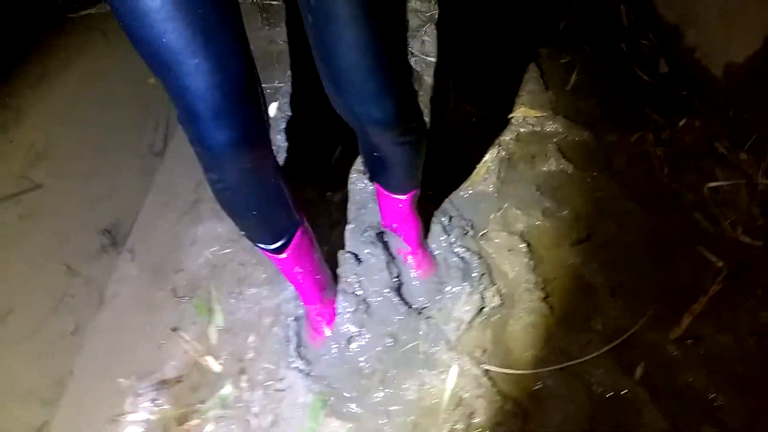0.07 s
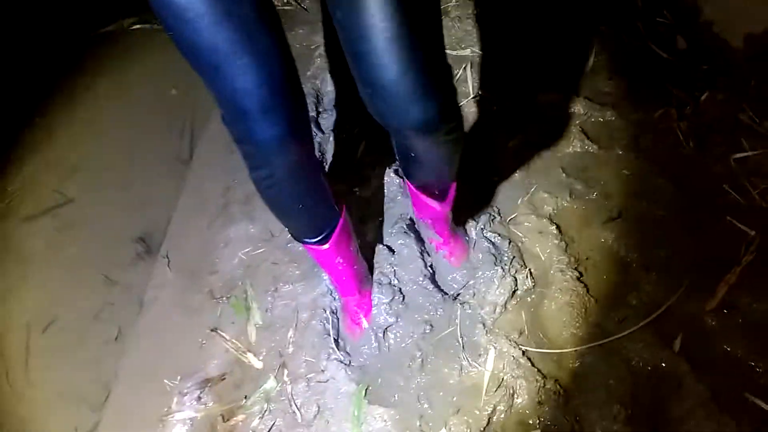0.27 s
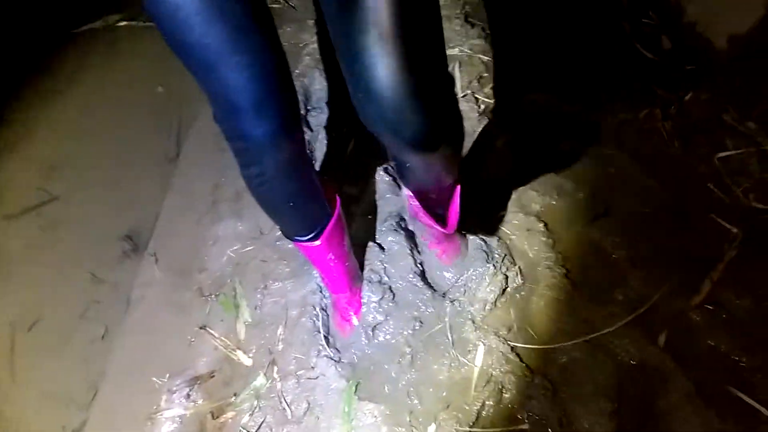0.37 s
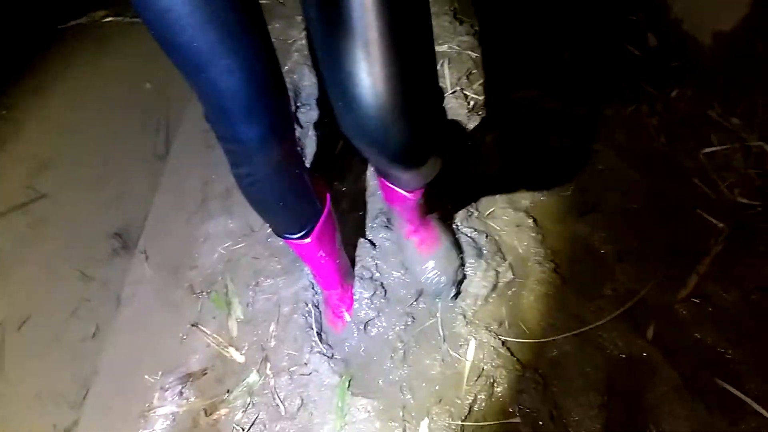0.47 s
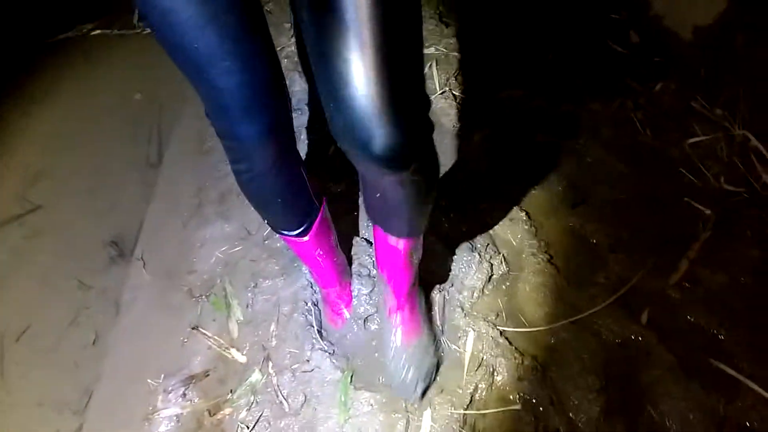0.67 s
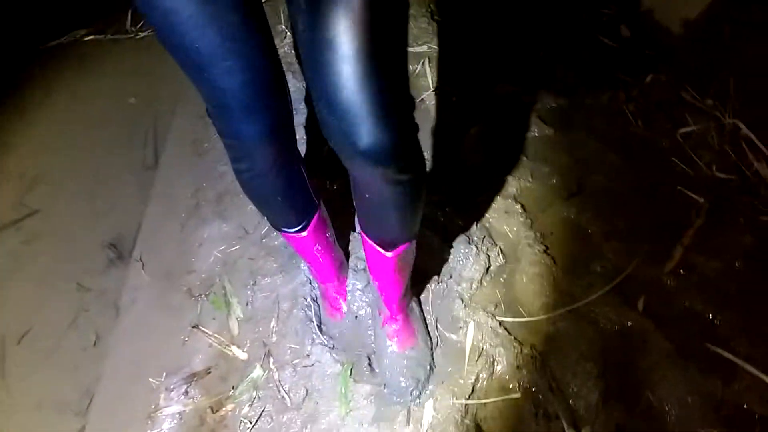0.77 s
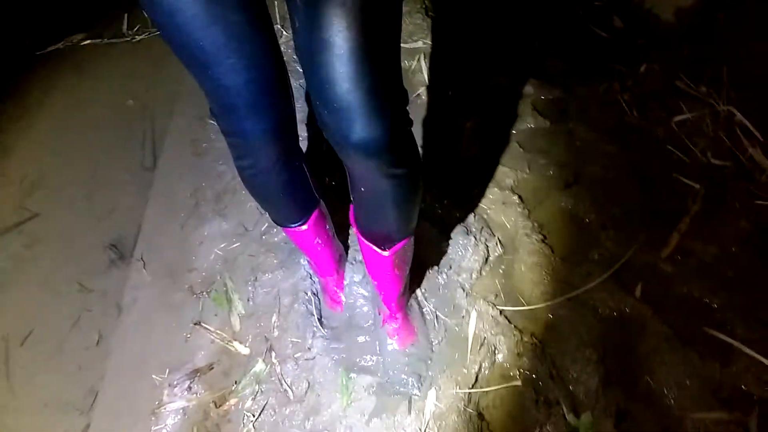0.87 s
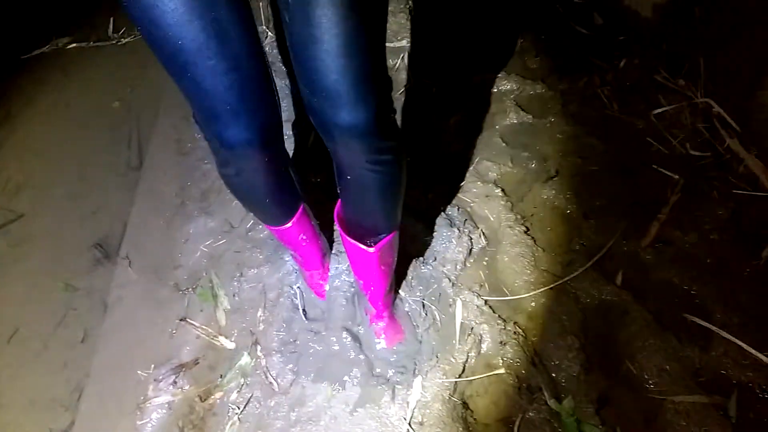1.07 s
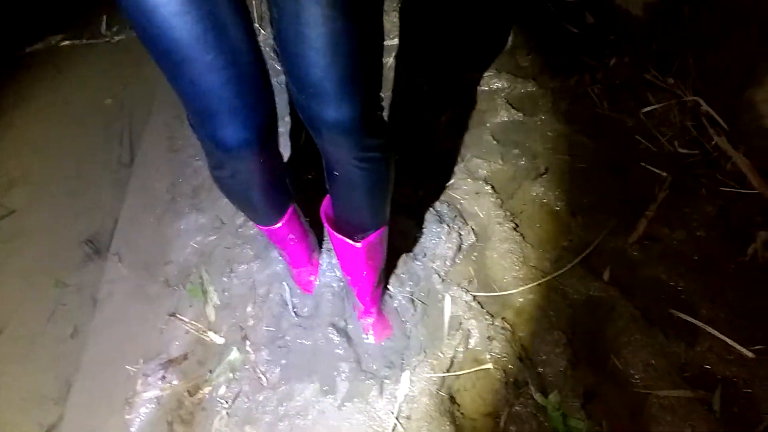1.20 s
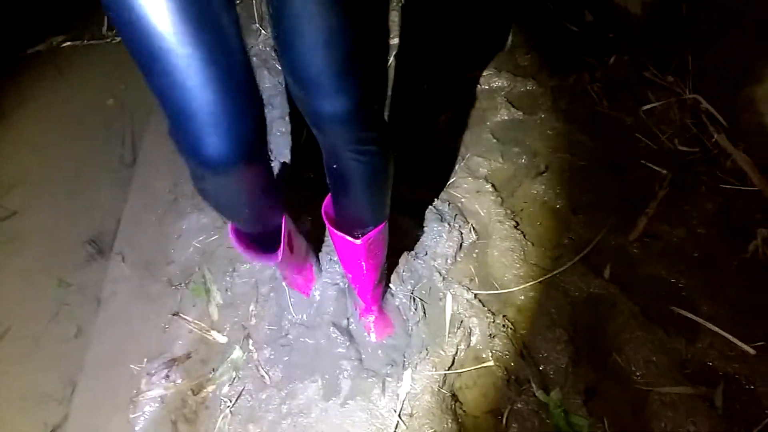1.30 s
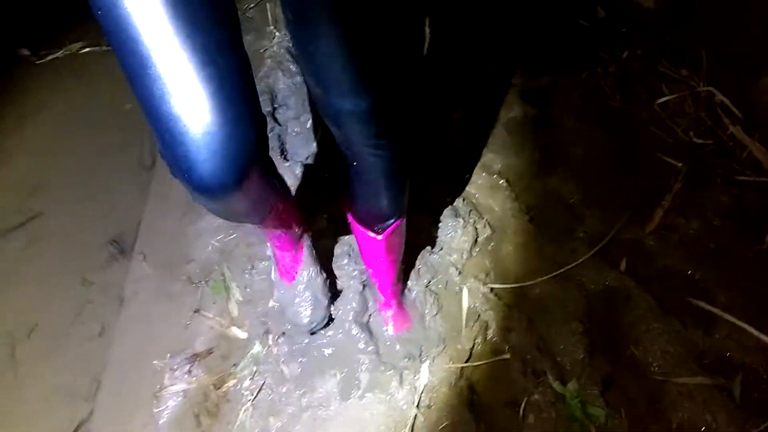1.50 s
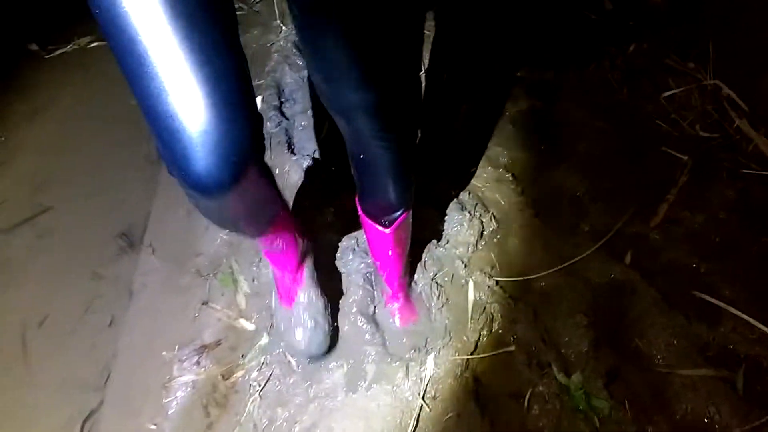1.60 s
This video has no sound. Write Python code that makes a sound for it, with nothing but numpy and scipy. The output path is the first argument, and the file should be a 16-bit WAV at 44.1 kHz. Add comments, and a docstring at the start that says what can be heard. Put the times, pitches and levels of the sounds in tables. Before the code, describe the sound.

Rubber boots squelch in sticky mud outdoors, close to the microphone. One pulls free with a loud sucking pop and lands with a softer splat, then the other starts pulling out, over a faint hiss.

```python
"""Outdoors at night, just above sticky mud: one rubber boot tears free with a loud suck and is set down
with a wet splat; then the other starts to pull out. Rupturing mud films radiate bursts of tiny impulses,
which excite bubbles and the hollow under the sole. Air pockets pop as damped oscillators, the mud keeps
ticking, wet rubber squeaks and the ground thuds. Near reflections and a faint scatter from the banks
follow; a soft hiss and a low rumble on the microphone lie beneath."""
import sys
import numpy as np
from scipy import signal
from scipy.fft import rfft, irfft, next_fast_len
from scipy.io import wavfile
from scipy.ndimage import uniform_filter1d

SR = 44100
rng = np.random.default_rng(int(sys.argv[2]) if len(sys.argv) > 2 else 0)


def inscribe(sig):
    """Save sig as 16-bit PCM at rate SR to the path in sys.argv[1].

    A 1-D sig is mono; a 2-D sig holds one channel per row.
    Samples are clipped to [-1, 1] before scaling.
    """
    pcm = np.round(np.clip(np.atleast_2d(sig).T, -1, 1) * 32767)
    wavfile.write(sys.argv[1], SR, pcm.astype(np.int16))


N = 72765
TIME, FREQS = np.arange(N) / SR, np.fft.rfftfreq(N, 1 / SR)


def from_db(db):
    """Amplitude ratio of a level in decibels."""
    return 10 ** (np.asarray(db) / 20)


def unit_rms(x):
    """Normalisation to an rms of 1."""
    return x / np.sqrt(np.mean(x ** 2) + 1e-20)


def at_hz(points, hz):
    """Interpolation of a table on a logarithmic frequency axis."""
    f, value = np.transpose(points)
    return np.interp(np.log(np.maximum(hz, 1)), np.log(f), value)


def colour(x, points, power=1):
    """Minimum-phase filtering by the folded cepstrum; the gain in dB is the table times power."""
    size = 2 * next_fast_len(len(x))
    gain = from_db(at_hz(points, np.fft.rfftfreq(size, 1 / SR)))
    cepstrum = irfft(power * np.log(gain))
    cepstrum[1:size // 2] *= 2
    cepstrum[size // 2 + 1:] = 0
    return irfft(rfft(x, size) * np.exp(rfft(cepstrum)))[:len(x)]


def resonate(x, hz, q):
    """Resonance as a steep band-pass of bandwidth about hz / q."""
    edge = np.exp(.5 / q)
    band = [hz / edge, min(hz * edge, SR / 2 - 1)]
    return signal.sosfilt(signal.butter(2, band, "band", fs=SR, output="sos"), x + 1e-18)


def add(out, onset, x):
    """Superposition of x on out, from an onset in seconds."""
    start = int(max(onset, 0) * SR)
    out[..., start:start + x.shape[-1]] += x[..., :N - start]


def clicks(per_s, size, spread_db=3.5):
    """A Poisson process of impulses, uneven in size and sign."""
    heights = from_db(spread_db * np.minimum(rng.exponential(1, size), 3))
    signs = rng.choice([-1, 1], size)
    return heights * signs * (rng.random(size) < per_s / SR)


def drift(size, window):
    """Slow random fluctuation: a moving average of white noise, rms 1."""
    return unit_rms(uniform_filter1d(rng.standard_normal(size), window))


def stereo_noise(spectrum, correlation):
    """Partially coherent noise: the balance of mid and side sets the correlation; rms 1."""
    mid, side = rfft(rng.standard_normal((2, N))) * from_db(at_hz(spectrum, FREQS))
    alike = np.clip(at_hz(correlation, FREQS), -1, 1)
    return unit_rms(irfft(np.sqrt(1 + alike) * mid + np.sqrt(1 - alike) * side * [[1], [-1]], N))


# Spectral density of the hiss: f/Hz, relative level/dB
HISS_SPECTRUM = [(30, 3.5), (130, -2.5), (250, -6.5), (400, -8), (700, -12.5), (1200, -13.5), (2000, -15.5),
                 (3000, -14), (4500, -16.5), (7000, -15), (9400, -14), (11500, -23.5), (13000, -25.5),
                 (16000, -40)]
# Coherence of the hiss: f/Hz, left-right correlation
HISS_CORRELATION = [(100, 1), (400, 0.83), (1000, 0.2), (2500, 0), (6000, 0), (14000, 0.07)]


def hiss(level_db=-52, waver_db=0.03):
    """Night air and the microphone give nearly stationary broadband noise."""
    gain = from_db(level_db + waver_db * drift(N, window=2500))
    return gain * stereo_noise(HISS_SPECTRUM, HISS_CORRELATION)


# Envelope of the rumble: t/s, level/dB
RUMBLE_ENVELOPE = [(0.0, -51), (0.16, -65.5), (0.362, -43.5), (0.398, -67), (0.514, -45), (0.556, -55.5),
                   (0.666, -57), (0.684, -52), (0.914, -58), (0.936, -45), (0.982, -63), (1.006, -46),
                   (1.074, -51), (1.216, -43), (1.432, -52), (1.466, -44.5), (1.584, -50.5), (1.65, -57)]
# Spectral density of the rumble: f/Hz, relative level/dB
RUMBLE_SPECTRUM = [(10, -26), (25, -19), (45, -1.5), (65, -3), (95, -1), (130, -10), (200, -23), (500, -53)]


def rumble(gain_db=0.5):
    """Air and handling on the microphone give amplitude-modulated low-frequency noise."""
    envelope = from_db(gain_db + np.interp(TIME, *np.transpose(RUMBLE_ENVELOPE)))
    return envelope * stereo_noise(RUMBLE_SPECTRUM, correlation=[(30, 0.63), (130, 0.17)])


# Small films snapping: t/s, level before filtering/dB
FILM_SNAPS = [(0.012, -36.5), (0.319, -40), (0.347, -42), (0.395, -41), (0.703, -50), (0.854, -50),
              (1.055, -37.5), (1.14, -37.5), (1.474, -39)]
# Spectrum of fine spray, shared by snaps, bubbles and tears: f/Hz, gain/dB
SPRAY_SPECTRUM = [(300, -35.5), (1000, -19), (2200, 0), (3400, 1), (4500, 0), (6000, -1), (7500, -6),
                  (9600, 4), (11500, -18), (14000, -30), (16000, -30)]


def snaps(size=1024, t60=0.0065, ticks_per_s=84, tick_db=-66.5):
    """Film rupture is a broadband transient: single films snap, and fainter ones tick at random."""
    out = from_db(tick_db) * unit_rms(clicks(ticks_per_s, N))
    decay = 1000 ** (-TIME[:size] / t60)
    for onset, db in FILM_SNAPS:
        snap = rng.standard_normal(size) * decay
        add(out, onset, from_db(db) * 2 * snap / np.abs(snap).max())
    return colour(out, SPRAY_SPECTRUM)


# Air pockets bursting: t/s, starting f/Hz, peak level/dB, T60/s, glide/(octaves per s)
AIR_POCKETS = [(0.062, 910, -50.5, 0.02, 22), (0.208, 470, -47.5, 0.032, 15), (0.2572, 1670, -8, 0.017, 36),
               (0.2701, 1495, -18.5, 0.016, 7.6), (0.2765, 1992, -25, 0.048, 6.5),
               (0.376, 960, -45.5, 0.013, 20), (0.4185, 2270, -47.5, 0.028, 6.7),
               (0.4353, 1726, -36.5, 0.012, 9.6), (0.488, 543, -29.5, 0.01, 37),
               (0.747, 4400, -29.5, 0.014, 11), (0.7492, 2380, -25.5, 0.0097, 20),
               (0.7685, 1850, -33.5, 0.04, 3.9), (0.7705, 6400, -24, 0.017, 13),
               (0.8135, 2270, -39, 0.012, 110), (0.8375, 1080, -39.5, 0.0078, 51),
               (0.8384, 2980, -30, .018, 5.7), (0.8402, 3930, -35, 0.0058, 80),
               (0.8805, 860, -46.5, .012, 23), (1.2589, 1150, -34.5, 0.012, 7.1),
               (1.335, 513, -39, 0.0074, 69), (1.512, 830, -48.5, 0.014, 18)]


def pops(size=2048, attack_s=0.0002, wobble=0.066):
    """An opening air pocket rings as a damped oscillator whose frequency rises unsteadily."""
    out, t = np.zeros(N), TIME[:size]
    for onset, hz, db, t60, glide in AIR_POCKETS:
        pitch = hz * 2 ** (glide * t) * (1 + wobble * drift(size, window=24))
        phase = 2 * np.pi * np.cumsum(pitch) / SR
        envelope = (1 - np.exp(-t / attack_s)) * 1000 ** (-t / t60)
        add(out, onset, from_db(db) * envelope / envelope.max() * np.sin(phase))
    return out


# Faint squeaks of wet rubber: t/s, duration/s, first f/Hz, last f/Hz, level/dB
RUBBER_SQUEAKS = [(0.094, 0.033, 2206, 2130, -55), (0.133, 0.054, 2030, 1860, -53),
                  (0.30, 0.086, 1554, 1480, -59), (0.492, 0.032, 1350, 1525, -53.5),
                  (1.041, 0.061, 2800, 2720, -59.5), (1.50, 0.053, 1480, 1450, -58),
                  (1.585, 0.072, 2770, 2830, -57)]


def squeaks(harmonics_db=(-2.5, -6.5, -11), wobble=0.0037):
    """Wet rubber vibrates almost periodically: a harmonic series on a gliding fundamental."""
    out = np.zeros(N)
    for onset, duration, first_hz, last_hz, db in RUBBER_SQUEAKS:
        progress = np.linspace(0, 1, int(duration * SR))
        pitch = first_hz + (last_hz - first_hz) * progress
        pitch *= 1 + wobble * drift(len(progress), window=100)
        phase = 2 * np.pi * np.cumsum(pitch) / SR
        tone = sum(from_db(level) * np.sin(k * phase) for k, level in enumerate(harmonics_db, 1))
        add(out, onset, from_db(db) * np.sin(np.pi * progress) * tone)
    return out


def bubbles(count=16, per_s=3700, low_hz=2485, high_hz=10500):
    """Tiny bubbles in the spray ring briefly as resonators under random impulses; rms 1."""
    pitches = np.geomspace(low_hz, high_hz, count)
    froth = sum(resonate(clicks(per_s / count, N), hz, q=11.2) for hz in pitches)
    return unit_rms(colour(froth, SPRAY_SPECTRUM))


# Wet mud ripped or squeezed: t/s, rise/s, T60/s, hollow f/Hz, hollow level/dB, spray level/dB,
# slop level/dB, fizz level re spray/dB, left minus right level/dB
MUD_TEARS = [(0.214, 0.0096, 0.086, 2340, -52, -45, -57, -15, -2.5),
             (0.2442, 0.00028, 0.019, 2180, -22, -26.5, -50, -16, -1),
             (0.2454, 0.00026, 0.018, 2950, -25.5, -45, -52, -25, 5),
             (0.2533, 0.00026, 0.026, 1540, -20, -20, -35.5, -12, 9),
             (0.256, 0.00045, .016, 1700, -29.5, -17, -35.5, -13, -10),
             (0.261, 0.0062, 0.032, 1694, -21.5, -24, -31.5, -13, -0.5),
             (0.274, .002, 0.02, 2160, -21, -23.5, -33, -12, 0.5),
             (0.289, 0.0022, 0.024, 2630, -38.5, -53.5, -46, -22, 2),
             (0.599, 0.0036, 0.032, 2400, -82, -47.5, -78, -21, -14),
             (0.7451, 0.00052, 0.056, 2100, -37.5, -32, -50.5, -8, 0),
             (0.757, .001, 0.017, 2700, -60, -35.5, -44.5, -19, 11),
             (0.763, 0.0083, 0.062, 2030, -38.5, -28, -48.5, -3.5, -3.5),
             (0.786, 0.0021, 0.05, 3000, -59, -39, -49.5, -13, 2),
             (0.805, 0.0016, 0.035, 1240, -41.5, -46, -54, -8, -2),
             (0.8151, 0.0019, 0.04, 5030, -55, -37.5, -49, -6, -3.5),
             (0.846, 0.0022, 0.43, 2900, -71, -49, -59.5, -10, 0.5),
             (0.8904, 0.00057, 0.019, 1830, -45, -38, -65, -2.5, -4.5),
             (1.25, 0.0062, 0.021, 1480, -37.5, -39.5, -50.5, -11, -5),
             (1.266, 0.0017, 0.082, 2100, -50, -40.5, -45.5, -11, -3),
             (1.289, .002, 0.04, 4400, -64, -50, -60, -12, 3),
             (1.31, 0.0064, 0.058, 2600, -70, -49, -69, -14, -4),
             (1.397, 0.00089, 0.041, 1220, -54, -49, -52.5, -14, -3)]
# Spectrum of the finest droplets: f/Hz, gain/dB
FIZZ_SPECTRUM = [(4000, -33.5), (7500, -8.5), (9700, 2.5), (11500, -7.5), (14000, -13), (15300, -17),
                 (16000, -27)]
# Spectrum of the heavy slop: f/Hz, gain/dB
SLOP_SPECTRUM = [(30, -40), (80, -24), (170, -7), (340, -6.5), (480, -1), (630, -9), (790, 2.5), (960, -18),
                 (1200, -3.5), (2500, -29), (8000, -85)]


def tears(size=6000, clicks_per_s=10000, bubble_db=1):
    """Source and filter: a swell of ruptures excites spray, dull slop and the hollow under the sole."""
    out, t, froth = np.zeros((2, N)), TIME[:size], bubbles()
    for onset, rise, t60, hollow_hz, hollow_db, spray_db, slop_db, fizz_db, pan_db in MUD_TEARS:
        swell = np.minimum(t / rise, 1) * 1000 ** (-np.maximum(t - rise, 0) / t60)
        rip = clicks(clicks_per_s, size) * swell
        droplets = unit_rms(colour(rip, SPRAY_SPECTRUM))
        bubbling = from_db(bubble_db) * unit_rms(froth[int(onset * SR):][:size] * swell)
        fizz = from_db(fizz_db) * unit_rms(colour(rip, FIZZ_SPECTRUM))
        spray = from_db(spray_db) * (unit_rms(droplets + bubbling) + fizz)
        slop = from_db(slop_db) * unit_rms(colour(rip, SLOP_SPECTRUM))
        hollow = from_db(hollow_db) * unit_rms(resonate(rip, hollow_hz, q=2.66))
        swell_rms = np.sqrt(np.mean(swell ** 2))   # refers the levels to the crest of the swell
        pan = from_db([[pan_db / 2], [-pan_db / 2]])
        add(out, onset, (spray + slop + hollow) * swell_rms * pan)
    return out


# Shifts of weight on the boot: t/s, f/Hz, level/dB, T60/s
WEIGHT_SHIFTS = [(0.492, 166, -46, .06), (0.498, 96, -42, .08), (0.93, 51, -40, 0.17),
                 (1.219, 92, -41, 0.12), (1.335, 194, -45, 0.067), (1.455, 87.5, -54, 0.09)]


def thuds(size=8192, attack_s=0.0095):
    """Soft ground yields under the boot in a heavily damped low-frequency oscillation."""
    out, t = np.zeros(N), TIME[:size]
    for onset, hz, db, t60 in WEIGHT_SHIFTS:
        envelope = np.minimum(t / attack_s, 1) * 1000 ** (-t / t60)
        add(out, onset, from_db(db) * envelope * np.sin(2 * np.pi * hz * t))
    return out


# Level difference between the microphone ports: f/Hz, nominal left minus right level/dB
PORT_LEVEL_DIFFERENCE = [(200, 1), (700, 1.5), (1300, 4.5), (2200, 10), (4400, 3), (8000, 2), (15000, 1)]
# Phase difference between the ports: f/Hz, lag of the right/rad
PORT_PHASE_LAG = [(0, 0), (1980, 1.24), (3800, 3.5), (6800, 11.5), (10100, 17), (16000, 23.5)]


def microphone_ports(x):
    """Direct sound reaches two ports with frequency-dependent differences of level and phase."""
    left = colour(x[0], PORT_LEVEL_DIFFERENCE, power=0.46)
    right = colour(x[1], PORT_LEVEL_DIFFERENCE, power=-0.59)
    lag = np.interp(FREQS, *np.transpose(PORT_PHASE_LAG))
    return np.array([left, irfft(rfft(right) * np.exp(-1j * lag), N)])


def reflect(x, t60):
    """Diffuse reflection: convolution with decaying noise of unit energy, different in each channel."""
    envelope = np.minimum(20 * TIME / t60, 1) * from_db(-60 * np.minimum(TIME / t60, 3))
    response = unit_rms(rng.standard_normal((2, N)) * envelope) / np.sqrt(N)
    return signal.fftconvolve(x, response, axes=1)[:, :N]


# Spectrum returned by banks and reeds: f/Hz, gain/dB
BANK_SCATTER = [(200, -4), (900, 10.5), (1600, -5.5), (3000, 5), (9000, 3), (15000, -10)]


def outdoors(x, near_db=-7, far_db=-20.5):
    """Legs and nearby ground reflect the direct sound; banks and reeds scatter a little back."""
    direct = microphone_ports(x)
    scattered = colour(x.mean(axis=0), BANK_SCATTER)[None]
    near = from_db(near_db) * reflect(direct, t60=0.027)
    far = from_db(far_db) * reflect(scattered, t60=0.28)
    return direct + near + far


def scene():
    """Superposition of the boots in the mud, their reflections and the night background."""
    boots = tears() + pops() + snaps() + squeaks() + thuds()
    return outdoors(boots) + hiss() + rumble()


def record(dry):
    """Band limiting: a steep elliptic low-pass removes the highest treble."""
    cutoff_hz = 15900
    return signal.sosfilt(signal.ellip(10, .1, 80, cutoff_hz, fs=SR, output="sos"), dry)


dry = scene()
out = record(dry)
inscribe(out)
```